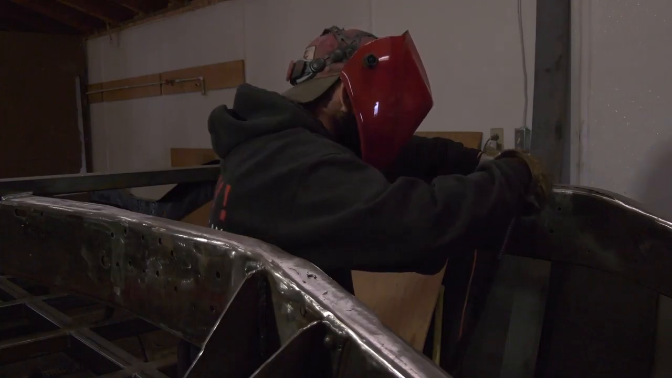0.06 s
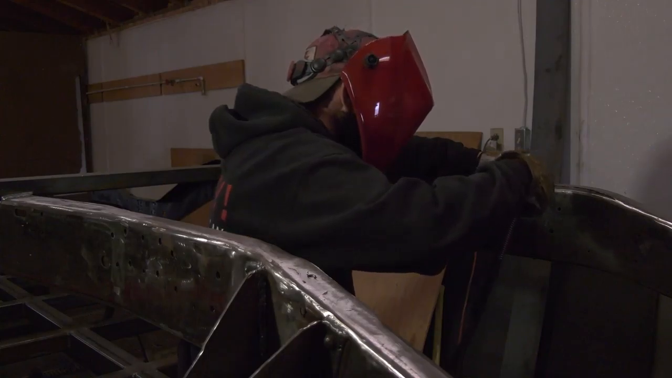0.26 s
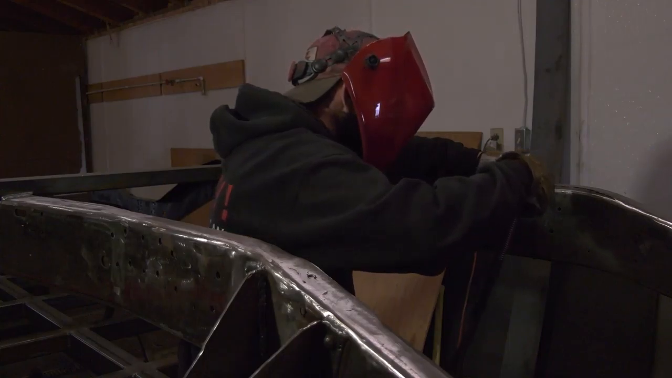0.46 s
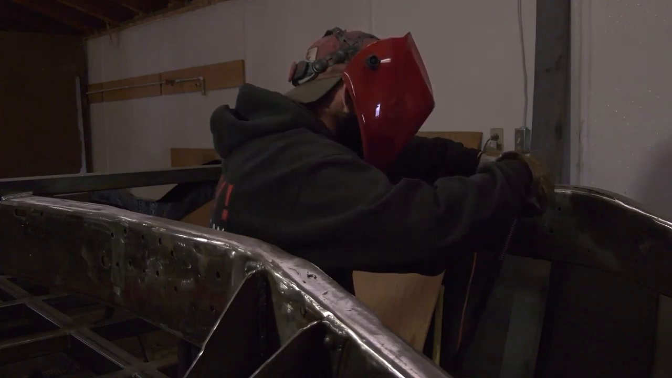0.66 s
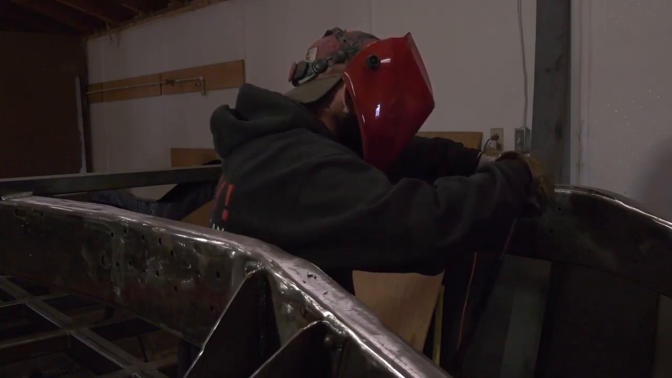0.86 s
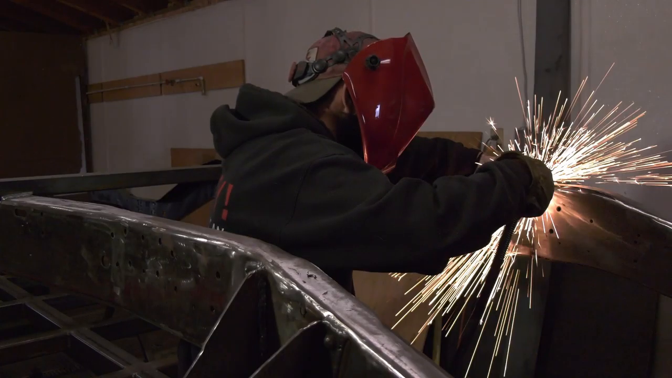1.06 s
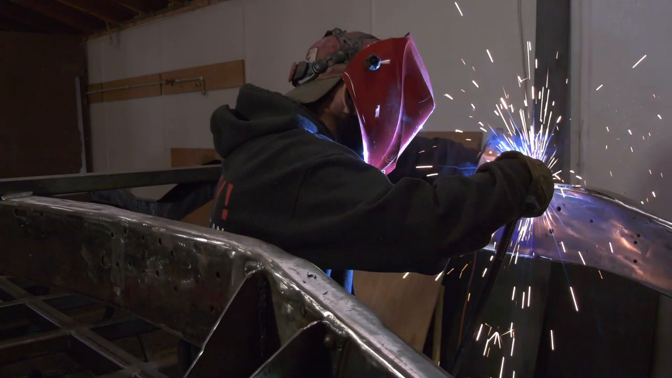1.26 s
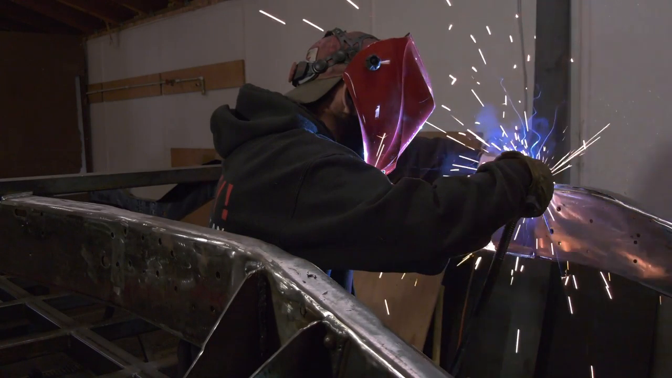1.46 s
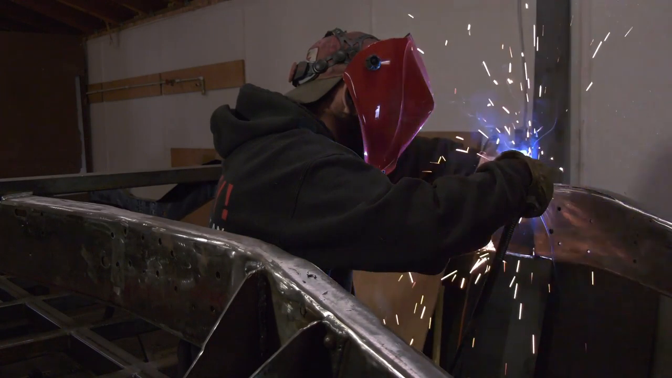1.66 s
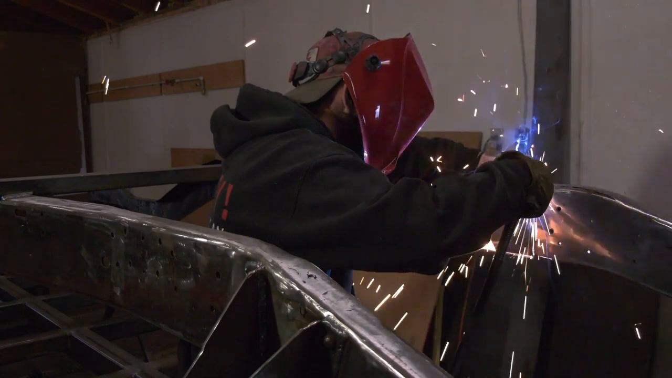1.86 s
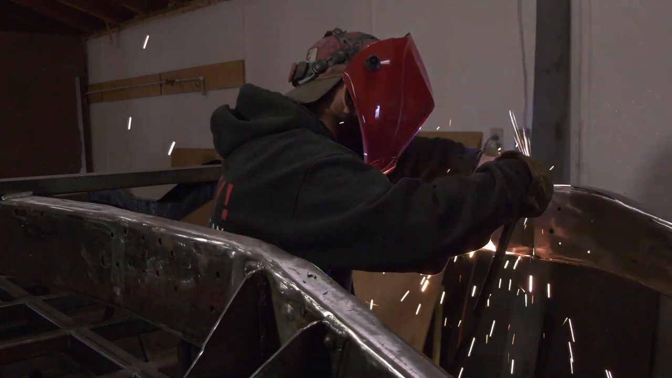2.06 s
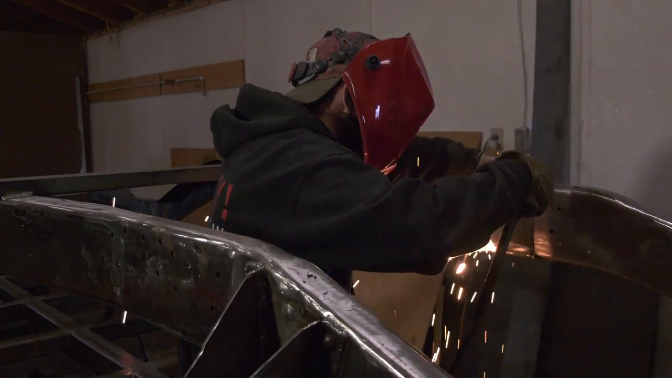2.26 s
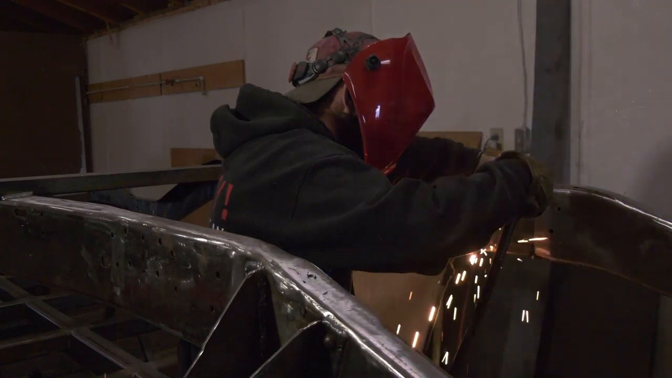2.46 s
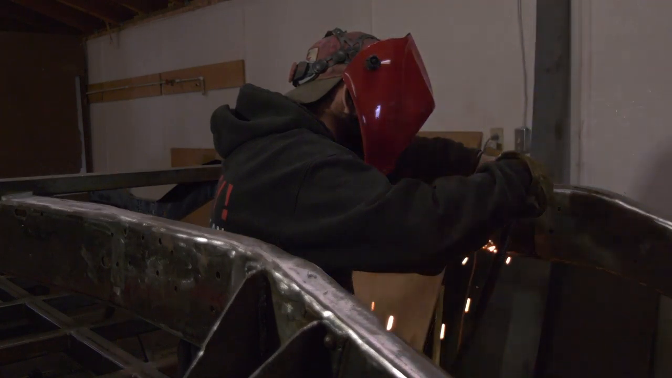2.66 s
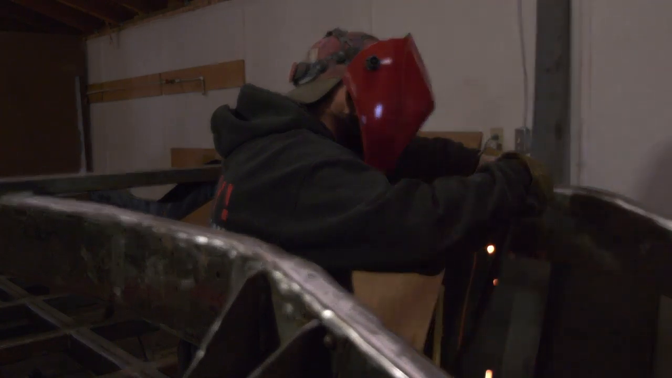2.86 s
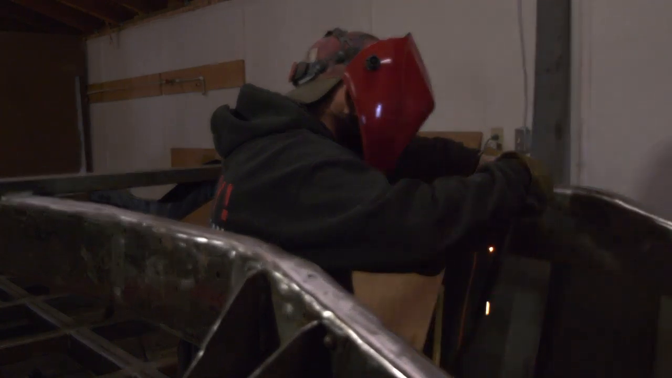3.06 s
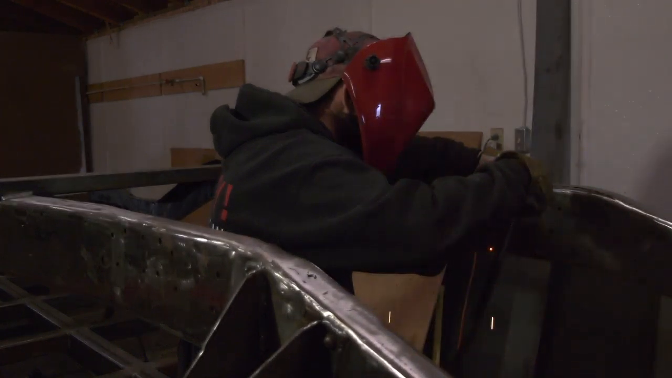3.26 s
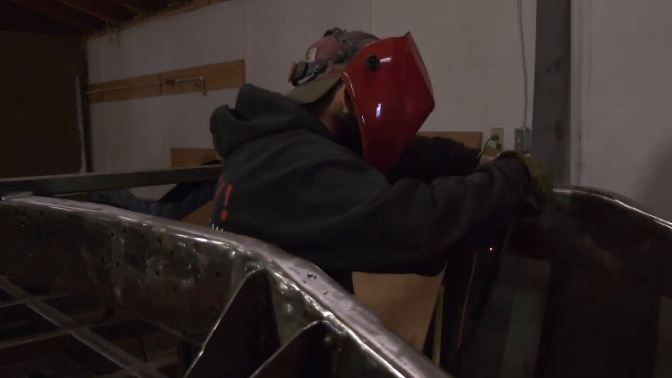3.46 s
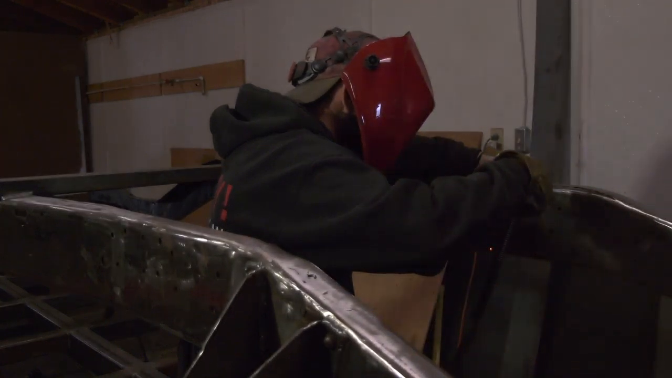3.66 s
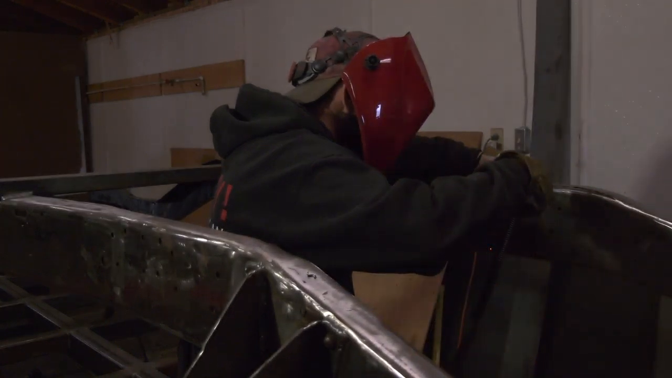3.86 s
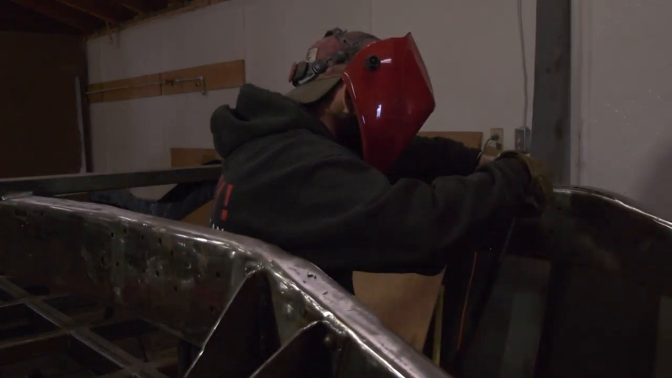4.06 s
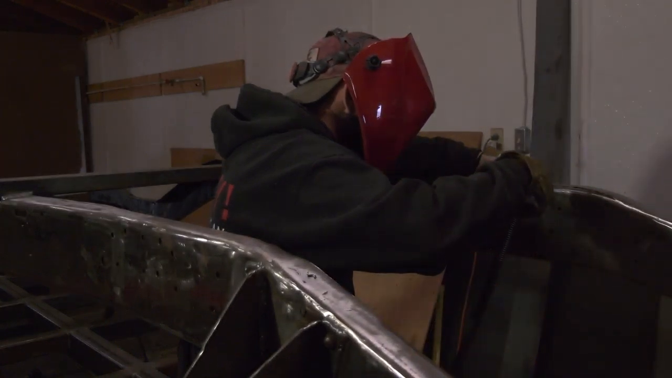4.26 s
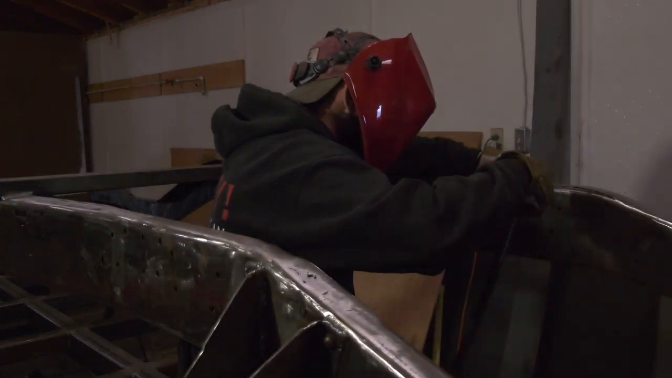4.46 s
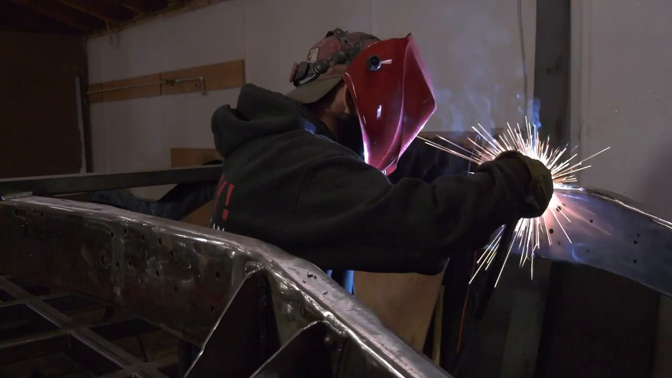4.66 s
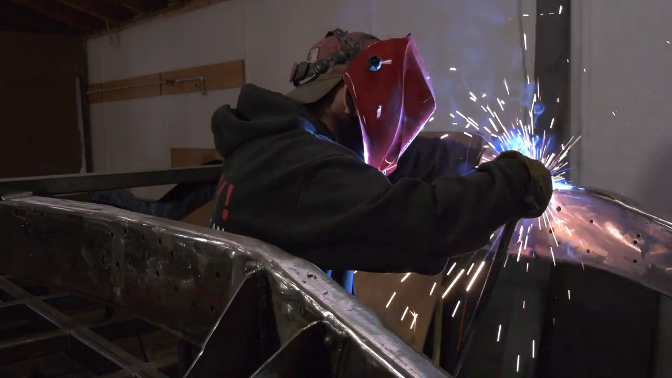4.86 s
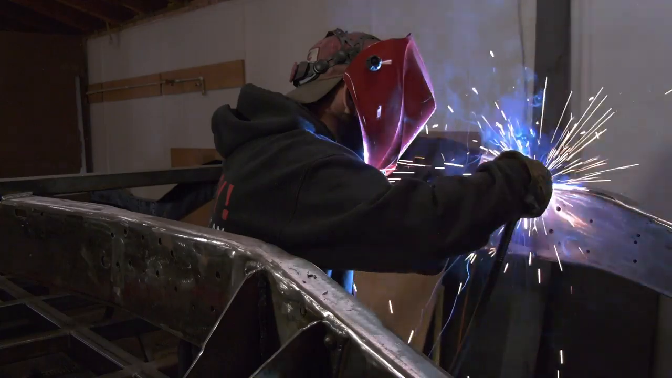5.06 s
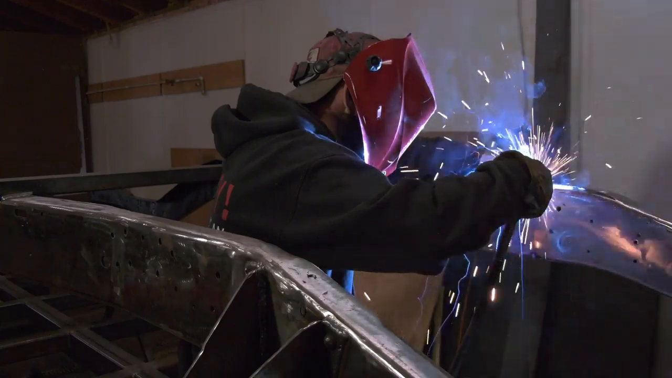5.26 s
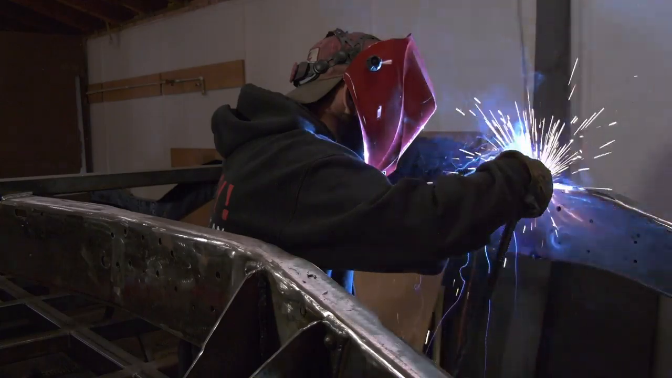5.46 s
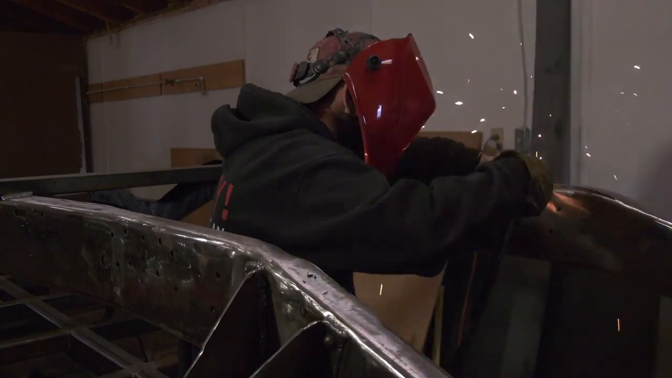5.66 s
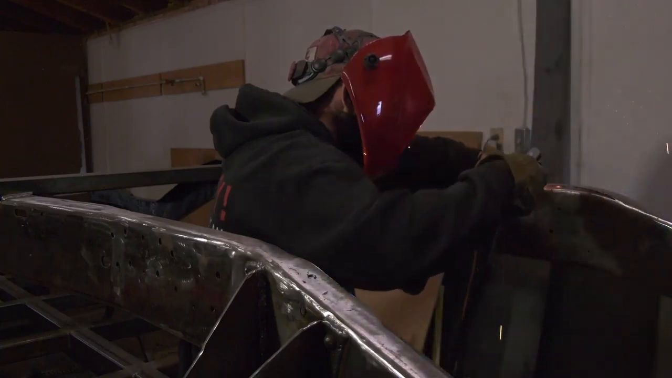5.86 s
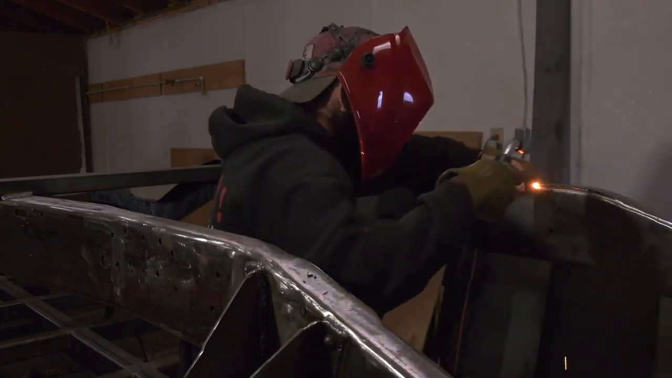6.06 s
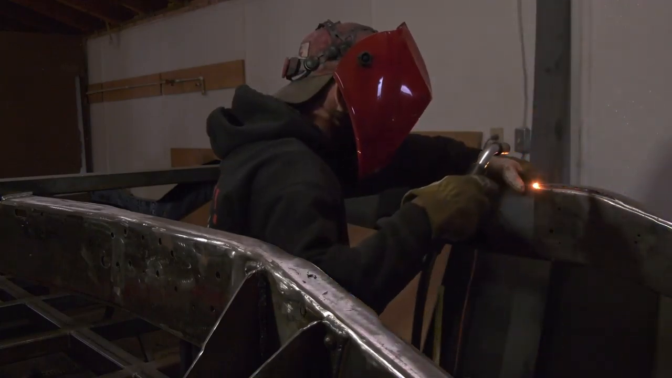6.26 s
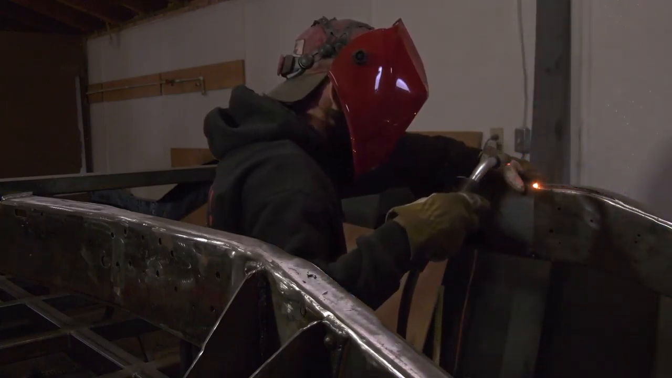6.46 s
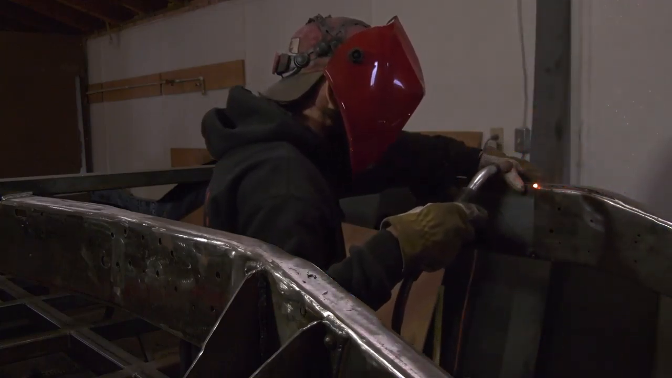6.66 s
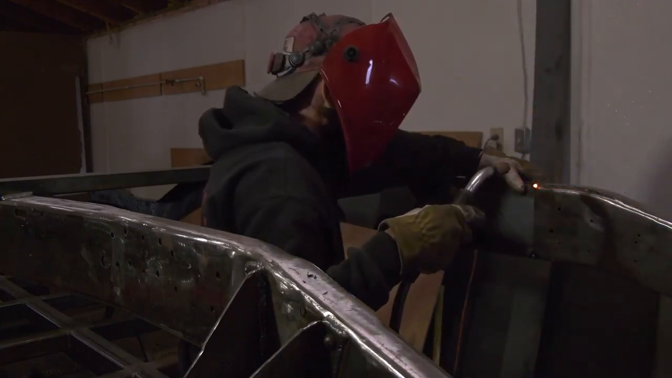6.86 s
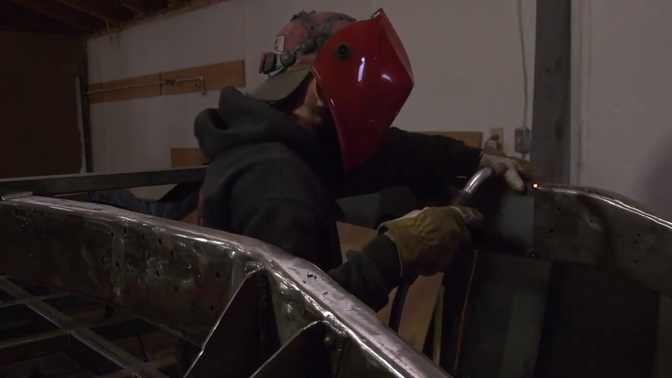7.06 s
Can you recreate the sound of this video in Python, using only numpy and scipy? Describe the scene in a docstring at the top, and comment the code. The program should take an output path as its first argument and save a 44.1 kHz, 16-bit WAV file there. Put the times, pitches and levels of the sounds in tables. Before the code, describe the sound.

A steady low mains hum and soft fan rush sit in a hard, echoing workshop. Around 0.6 s a glove or torch scuffs dully on steel. At 1.1 s an arc strikes with a sharp bang, sputters unevenly, then from 1.3 s crackles about a hundred times a second, a harsh bright buzz with loud spatter pops and low electrical thumps. It cuts off near 2.1 s, leaving a roughly one-second tail and faint gas hiss. A valve clacks at 2.8 s, with tiny ticks near 3 s; hiss ends at 3.5 s. Subtle scuffs and a faint metallic nozzle touch come by 4.35 s. At 4.7 s a second, stronger strike bursts into steadier fierce crackling, ending about 5.6 s. The tail fades over hum, recovering from ducked gain; a valve clacks at 6.35 s, then a dull scuff at 6.5 s.

```python
"""Tack welding in a workshop

Two MIG tack welds on a steel frame in a hard-walled shop, over transformer hum and the rush of a cooling fan.
The arc strikes with a bang and sputters (shaped noise, low electrical thumps), then crackles as the wire shorts
about a hundred times a second (spikes and fizz). A faint hiss lingers, a valve clacks, gloves and torch scuff.
A stereo microphone pair hears it with reflections and a long tail; the camera's gain ducks and creeps back."""
import sys
import numpy as np
from scipy import signal
from scipy.fft import rfft, irfft, next_fast_len
from scipy.io import wavfile
from scipy.ndimage import uniform_filter1d, map_coordinates

SR = 44100
rng = np.random.default_rng(int(sys.argv[2]) if len(sys.argv) > 2 else 0)


def store_pcm(level_fs):
    """Save levels as 16-bit WAV."""
    pcm = np.round(np.clip(level_fs, -1, 1) * 32767).astype(np.int16)
    wavfile.write(sys.argv[1], SR, np.atleast_2d(pcm).T)


N = 313462

# Transformer hum. Each row: multiple of the mains frequency, relative level in dB.
HUM_HARMONICS = [(2, -39.5), (5, -57.5), (6, -57.5), (7, -65.5), (8, -46), (10, -54), (12, -62.5),
                 (13, -63), (16, -69.5), (18, -65.5), (22, -66.5), (25, -72)]
MAINS_HZ = 59.9
# Rush of the cooling fan. Each row: frequency in Hz, relative density in dB per Hz.
FAN_SPECTRUM = [(25, -15), (50, -12), (110, -2.5), (250, -0.5), (650, -5.5), (1400, -15.5), (2800, -20),
                (6500, -26.5), (10500, -28.5), (15800, -23.5)]
# Likeness of the fan at the two microphones. Each row: frequency in Hz, left-right correlation (-1 to 1).
FAN_ALIKE = [(100, 1), (450, 0.38), (1200, 0.11), (3000, -.1), (6000, -0.15), (15000, .1)]

# Faint hiss at the nozzle; the first outlasts the valve's clack. Each row: start in seconds, end in seconds.
GAS_HISS = [(1.08, 3.5), (4.7, 6.35)]
# Gloves and torch shift on the frame.
# Each row: start in seconds, dull level in dB, bright level in dB, 60 dB decay in seconds.
SCUFFS = [(.58, -33.5, -60, 0.38), (.73, -46, -74, 1.5), (3.31, -74, -63, .4), (3.619, -68.5, -61, .6),
          (4.021, -72, -60, .6), (4.35, -58.5, -56.5, .4), (4.48, -68, -54.5, .9), (6.09, -57, -52, .9),
          (6.48, -38.5, -64.5, 1.28)]
# Small ticks of spatter and wire. Each row: time in seconds, level in dB.
TICKS = [(1.0786, 11.5), (2.9394, -19.5), (3.0185, -16), (4.3494, -35.5), (4.6593, -22)]
# Colour of the dull part of a scuff. Each row: frequency in Hz, relative density in dB per Hz.
DULL_SPECTRUM = [(80, -24.5), (300, 2.5), (550, 6.5), (750, 1.5), (1000, -8.5), (1700, -13), (3000, -34),
                 (10000, -58)]
# The torch nozzle touches the steel. Each row: frequency in Hz, level in dB, 60 dB decay in seconds.
NOZZLE_MODES = [(1960, -58, 0.25), (2360, -59, .3), (2900, -61, .28), (3380, -57, .3)]

# The gas valve shuts. Each row: time in seconds, level in dB.
VALVE_CLACKS = [(2.776, -16.5), (6.348, -15)]
# Colour of the valve's rattle. Each row: frequency in Hz, relative density in dB per Hz.
CLACK_SPECTRUM = [(60, -21), (190, 1), (272, 12), (370, -2), (1200, -5), (2600, -10), (5000, 0),
                  (7000, -4.5), (10000, -8.5), (15800, -18.5)]
# The welder's case rings with the valve.
# Each row: frequency in Hz, level in dB within the clack, 60 dB decay in seconds.
CASE_MODES = [(250, -17, 0.052), (283, -3.5, 0.15), (940, -22, 0.18), (1371, -19, 0.22), (3130, -28, 0.51),
              (4750, -17, 0.065)]

# Low electrical thumps picked up as the arc switches. Each row: time in seconds, level in dB.
THUMPS = [(1.0951, 14), (1.3445, 3), (1.3893, 12), (1.6481, 12.5), (1.7723, 10), (4.7836, 15.5),
          (4.849, 23), (5.0547, 16.5), (5.0657, 16.5), (5.2221, 13.5)]
SMALL_THUMP_DB = -3  # ceiling of the lesser ones that fall at random while the wire feeds
LEFT_LAG_S = .0004  # the left pulse comes this much later

# The tack welds. Each row: arc lit in seconds, wire feeding steadily in seconds, trigger let go in seconds,
# short circuits per second, sizzle level in dB, roar level in dB, crack level over the sizzle in dB.
WELDS = [(1.092, 1.303, 2.056, 100, -8.5, -23.5, 27), (4.7, 4.789, 5.564, 105, -2.5, -14, 25)]
# The arc strikes or flares.
# Each row: start in seconds, sizzle in dB, roar in dB, swell in seconds, 60 dB decay in seconds.
FLARES = [(1.0933, 3, 5, .001, 0.077), (1.13, -4.5, -5, .068, 0.22), (1.209, 3.5, -14, .002, 0.029),
          (1.258, 2, -14.5, .032, 0.13), (1.759, 2.5, -11.5, .004, 0.11), (1.92, -14.5, -20.5, .11, .1),
          (4.7038, 13.5, -6.5, .001, .05), (4.766, 7, -17, .013, .1), (4.9, -8.5, -26, .09, .2),
          (5.049, 8, -9.5, .005, .06), (5.223, 4.5, -12.5, .003, .08), (5.598, -4.5, -26, 0.018, .09)]
# The loudest cracks of spatter. Each row: time in seconds, relative level in dB.
LOUD_CRACKS = [(1.3194, 0), (1.3354, -1), (1.3474, 3), (1.5454, -2), (1.5678, -4), (1.6262, 0.5),
               (1.7265, -2), (1.7968, 3.5), (1.9046, -2), (1.949, 1), (2.0098, -1.5), (2.1011, -4.5),
               (4.995, -1), (5.1003, -3), (5.1911, -2.5), (5.5124, -3), (5.5468, -4), (5.5987, -3.5),
               (5.6124, -0.5)]
LOUD_CRACK_DB = 23  # gain shared by those cracks
ARC_RISE_S, ARC_FADE_S = .005, .012  # time constants of lighting and going out
SAG_DB_PER_S = 2.5  # the sizzle calms as the steel heats up
WANDER_DB, WANDER_PER_S = 0.47, 18  # the arc length is never quite steady
DIP_DB, DIP_S = 1.5, 0.035  # the arc burns weakly after each listed thump
# Colours of the sizzle, the cracks and the roar. Each row: frequency in Hz, relative density in dB per Hz.
SIZZLE_SPECTRUM = [(40, -31), (170, -6), (400, -10), (1300, -11), (1850, -12.5), (3500, -5.5), (4400, 0),
                   (6200, 0), (7500, -4.5), (9000, -0.5), (11000, -1), (13500, -6), (15800, -4),
                   (16500, -40)]
CRACK_SPECTRUM = [(40, -32), (200, -6.5), (1300, -8), (1900, -13), (3500, -5.5), (4400, -2), (6000, -1.5),
                  (7500, -2), (9300, 1), (11500, 0.5), (15800, -6), (16500, -41.5)]
ROAR_SPECTRUM = [(30, -28), (140, -2.5), (400, -1.5), (800, -1), (1200, 0), (2050, -4), (3000, -3.5),
                 (6000, -23.5), (15000, -46.5)]
# Resonances of the steel frame. Each row: centre in Hz, width in Hz, gain at the centre in dB.
FRAME_MODES = [(171, 14, 0.5), (293, 28, -1.5), (1206, 16, -6.5), (1406, 54, -5), (1497, 20, -6.5),
               (4210, 32, -4.5), (4351, 33, -5), (4840, 36, -5), (4905, 20, -4), (5906, 18, -6),
               (6509, 35, -5), (8822, 45, -8)]

# Decay of the workshop's tail. Each row: frequency in Hz, 60 dB decay in seconds.
HALL_DECAY = [(100, 1.3), (300, 1), (1000, 1.08), (2000, 1.17), (5000, 0.86), (9000, 0.4147), (14000, 0.31)]
# Colour of the tail. Each row: frequency in Hz, level in dB before each source's own tail setting.
HALL_LEVEL = [(30, -12.5), (170, -2.5), (1000, 2), (5000, -7.5), (14000, -1.5)]
# Likeness of the microphones in the diffuse field. Each row: frequency in Hz, left-right correlation.
ROOM_ALIKE = [(100, .93), (450, .84), (1200, .76), (5000, .58), (9000, .48), (15000, 0.52)]
# Phase between the microphones. Each row: frequency in Hz, lag of the right in radians (negative: it leads).
MIC_LAG = [(3000, -0.5), (7000, 0.1), (8600, -1.2), (10500, -2.5), (15000, -2)]
# Balance of the microphones. Each row: frequency in Hz, left over right in dB.
MIC_BALANCE = [(200, -1), (6000, -0.5), (9000, 4), (12000, -0.5)]
TOP_HZ = 15900  # the camera passes nothing above this


def amp(db):
    """Decibels to gain."""
    return 10 ** (np.asarray(db) / 20)


def unit(x):
    """Scale to rms 1."""
    return x / np.sqrt(np.mean(x ** 2) + 1e-20)


def along(points, hz):
    """Read (Hz, value) points on a log frequency axis."""
    f, v = np.transpose(points)
    return np.interp(np.log(hz + 1), np.log(f + 1), v)


def clock():
    """The time of every sample, in seconds."""
    return np.arange(N) / SR


def wobble(rate):
    """A smooth random curve with this many knots a second."""
    knots = rng.standard_normal(int(N * rate / SR) + 4)
    return map_coordinates(knots, [clock() * rate])


def filtered(x, response):
    """x times a complex response of frequency."""
    m = next_fast_len(N + SR // 2)
    return irfft(rfft(x, m) * response(np.fft.rfftfreq(m, 1 / SR)), m)[..., :N]


def convolved(x, kernel):
    """x through one kernel, or one per channel."""
    return signal.fftconvolve(np.atleast_2d(x), np.atleast_2d(kernel), axes=1)[:, :N]


def coloured(x, spectrum, size=4096):
    """x through a causal minimum-phase filter of unit energy with this spectrum."""
    # folding the cepstrum onto positive times makes the filter causal
    cepstrum = irfft(np.log(amp(along(spectrum, np.fft.rfftfreq(size, 1 / SR)))))
    cepstrum[1:size // 2] *= 2
    cepstrum[size // 2 + 1:] = 0
    kernel = irfft(np.exp(rfft(cepstrum)))
    return convolved(x, kernel / np.linalg.norm(kernel))[0]


def noise(spectrum):
    """Coloured noise of about rms 1."""
    return coloured(rng.standard_normal(N), spectrum)


def impulses(times, gains):
    """One spike at each time."""
    return np.bincount(np.round(np.asarray(times) * SR).astype(int), gains, N)[:N]


def decay(age, t60):
    """An exponential fall of 60 dB in t60 seconds."""
    return np.exp(-np.log(1000) * age / t60)


def burst(s, t60, rise):
    """An envelope that rises at s and dies away."""
    age = np.maximum(clock() - s, 0)
    return (1 - np.exp(-age / rise)) * decay(age, t60)


def surge(s, swell, t60):
    """An envelope that grows from s for swell seconds, then dies away."""
    age = clock() - s
    return np.clip(age / swell, 0, 1) * decay(np.maximum(age - swell, 0), t60)


def ringing(s, modes, chatter=0.55):
    """Damped modes set going at s, their phase roughened by the chattering contact."""
    total = 0
    for hz, db, t60 in modes:
        phase = 2 * np.pi * hz * (clock() - s) + chatter * wobble(hz / 12)
        total = total + amp(db) * burst(s, t60, rise=0.0023) * np.sin(phase)
    return total


def spread(pair, hz, alike):
    """Two unrelated spectra become left and right of a diffuse field with this likeness."""
    turn = np.arccos(np.clip(along(alike, hz), -1, 1)) / 2
    mid, side = pair[0] * np.cos(turn), pair[1] * np.sin(turn)
    return np.array([mid + side, mid - side])


def diffuse(t60s, levels):
    """A stereo tail of noise in which each frequency has its own level and decay."""
    hz, t, z = signal.stft(rng.standard_normal((2, SR + SR // 2)), SR, nperseg=256)
    t60 = along(t60s, hz)[:, None]
    level = amp(along(levels, hz))[:, None]
    unit_energy = np.sqrt(2 * np.log(1000) / (t60 * SR))
    shape = level * decay(t, t60) * unit_energy
    return signal.istft(spread(z, hz[:, None], ROOM_ALIKE) * shape, SR, nperseg=256)[1]


def workshop(x, scatter_db, tail_db):
    """Direct sound, three near reflections, a quick scatter off the frame and the long tail of the shop."""
    scatter = diffuse([(200, 0.077), (10000, .13)], [(1000, scatter_db)])
    response = scatter + amp(tail_db) * diffuse(HALL_DECAY, HALL_LEVEL)
    response[:, 0] += 1  # direct sound
    for delay_s, gain in [(.0017, 0.22), (.0053, .25), (.0076, .35)]:
        response[:, round(delay_s * SR)] += gain
    return convolved(x, response)


def transformer(hum_db=2.0):
    """The transformer hums in steady sines on multiples of the mains frequency."""
    lines = 0
    for multiple, db in HUM_HARMONICS:
        cycles = multiple * MAINS_HZ * clock() + rng.random()
        lines = lines + amp(db) * np.sin(2 * np.pi * cycles)
    return amp(hum_db) * np.sqrt(2) * lines  # a sine of peak root 2 has rms 1


def fan(fan_db=-45):
    """The cooling fan rushes steadily: turbulent noise, spread wide between the microphones."""
    spectra = rfft([noise(FAN_SPECTRUM), noise(FAN_SPECTRUM)])
    return amp(fan_db) * irfft(spread(spectra, np.fft.rfftfreq(N, 1 / SR), FAN_ALIKE), N)


def background():
    """Hum and fan together, a little stronger in the left microphone."""
    return (transformer() + fan()) * amp([[1.05], [-1.05]])


def gas(gas_db=-60):
    """Faint hiss of noise through each weld and for a while after, the first outlasting its valve's clack."""
    hissing = sum((clock() > start) & (clock() < end) for start, end in GAS_HISS)
    return amp(gas_db) * hissing * noise(SIZZLE_SPECTRUM)


def scuffs():
    """Gloves and torch rub on the frame: dull and bright friction noise in soft strokes."""
    dull, bright = 0, 0
    for s, dull_db, bright_db, t60 in SCUFFS:
        stroke = burst(s, t60, rise=0.0041)
        dull = dull + amp(dull_db) * stroke
        bright = bright + amp(bright_db) * stroke
    unevenness = amp(1.8 * wobble(40))
    return unevenness * (dull * noise(DULL_SPECTRUM) + bright * noise(SIZZLE_SPECTRUM))


def ticks():
    """Spatter and wire tick: single spikes with the colour of a crack."""
    s, db = np.transpose(TICKS)
    return coloured(impulses(s, amp(db)), CRACK_SPECTRUM)


def nozzle_touch():
    """The torch nozzle touches the steel and rings faintly in a few damped modes."""
    return ringing(4.347, NOZZLE_MODES, chatter=.85)


def valve(rattle_db=3):
    """The gas solenoid drops shut: a burst of rattling noise, and the welder's case rings."""
    rattle = unit(amp(rattle_db * wobble(400)) * noise(CLACK_SPECTRUM))
    total = 0
    for s, db in VALVE_CLACKS:
        clack = rattle * burst(s, t60=0.13, rise=0.00068)
        total = total + amp(db) * (clack + ringing(s, CASE_MODES))
    return total


def thumps(width_s=0.00028, swing_hz=120, swing=1.6, fade_s=0.0027, left_share=0.55):
    """Electrical pickup as the arc switches: a blunt pulse, later on the left, with a low swing on the right."""
    t = np.arange(SR // 20) / SR
    lead_s = .0006  # room for the pulse's rising side

    def pulse(at):
        return np.exp(-((t - at) / width_s) ** 2)

    age = np.maximum(t - lead_s, 0)
    swing_back = swing * np.sin(2 * np.pi * swing_hz * age) * np.exp(-age / fade_s)
    left = left_share * pulse(lead_s + LEFT_LAG_S)
    right = pulse(lead_s) - swing_back

    s, db = np.transpose(THUMPS)
    jolts = impulses(s, amp(db))
    for _, feeding, stop, *_ in WELDS:
        when, size = rng.random(size=(14, 2)).T
        # lesser jolts of either polarity
        jolts = jolts + impulses(feeding + when * (stop - feeding), amp(SMALL_THUMP_DB) * (2 * size - 1))
    return convolved(jolts, [left, right])


def arc_levels():
    """Sizzle and roar gains: each weld lights, burns, dips after a listed thump and goes out; sizzle calms."""
    t, sizzle, roar = clock(), 0, 0
    for start, _, stop, _, sizzle_db, roar_db, _ in WELDS:
        age = np.maximum(t - start, 0)
        burning = (1 - np.exp(-age / ARC_RISE_S)) * np.exp(-np.maximum(t - stop, 0) / ARC_FADE_S)
        sizzle = sizzle + burning * amp(sizzle_db - SAG_DB_PER_S * age)
        roar = roar + burning * amp(roar_db)
    starved = sum((t > s) * np.exp(-((t - s) / DIP_S) ** 2) for s, _ in THUMPS)
    unrest = amp(-WANDER_DB * wobble(WANDER_PER_S) - DIP_DB * np.minimum(starved, 1))
    return sizzle * unrest, roar * unrest


def plasma(sizzle, roar, grain_db=4.0, plasma_db=-1.07):
    """The arc's hot gas sizzles and roars: two noises that surge with each flare and pulse with the current."""
    for s, sizzle_db, roar_db, swell, t60 in FLARES:
        flare = surge(s, swell, t60)
        sizzle = sizzle + amp(sizzle_db) * flare
        roar = roar + amp(roar_db) * flare
    # the rectified current pulses at twice the mains; the boiling metal adds fine grain
    ripple = 1 + 0.16 * np.sin(2 * np.pi * 2 * MAINS_HZ * clock())
    grain = amp(plasma_db) * unit(amp(grain_db * wobble(1500)))
    return ripple * grain * (sizzle * noise(SIZZLE_SPECTRUM) + roar * noise(ROAR_SPECTRUM))


def cracks(sizzle, scatter_db=3, jitter=.22):
    """Each short circuit of the wire ends in a crack, at a jittered rate; the loudest have set times."""
    loud_s, loud_db = np.transpose(LOUD_CRACKS)
    spikes = impulses(loud_s, amp(LOUD_CRACK_DB + loud_db))
    for _, feeding, stop, rate, _, _, over_db in WELDS:
        timing, size = rng.standard_normal((150, 2)).T
        s = feeding + np.cumsum(np.exp(jitter * timing)) / rate
        # a drop takes time to form: no ordinary crack within 5 ms of a loud one
        clear = np.abs(s[:, None] - loud_s).min(axis=1) > .005
        ready = (s < stop) & clear
        gain = np.interp(s, clock(), sizzle) * amp(over_db + scatter_db * np.clip(size, -2, 1))
        spikes = spikes + impulses(s[ready], gain[ready])
    return spit(spikes)


def spit(spikes, fizz=.22, life_s=0.00062):
    """Each crack is a spike and about a millisecond of fizz as the arc relights."""
    fading = np.exp(-np.arange(SR // 100) / SR / life_s)
    tail = fizz * convolved(spikes, fading)[0] * rng.standard_normal(N)
    return coloured(spikes + tail, CRACK_SPECTRUM)


def frame(x):
    """The steel under the arc adds its narrow resonances."""
    def response(f):
        total = 1
        for centre, width, db in FRAME_MODES:
            loss = 1j * f * width
            total = total + amp(db) * loss / (centre * centre - f * f + loss)
        return total
    return filtered(x, response)


def weld():
    """The arc's plasma and cracks, ringing the frame and filling the shop."""
    sizzle, roar = arc_levels()
    burning = workshop(frame(plasma(sizzle, roar)), scatter_db=0, tail_db=0.5)
    return burning + workshop(frame(cracks(sizzle)), scatter_db=0.5, tail_db=-1)


def microphones(x):
    """The pair differs in level and phase with frequency, so the treble turns out of phase."""
    def ports(hz):
        half_db = along(MIC_BALANCE, hz) / 2
        return [amp(half_db), amp(-half_db) * np.exp(-1j * along(MIC_LAG, hz))]
    return filtered(x, ports)


def scene():
    """Everything sounds in the shop before the microphone pair; the electrical thumps bypass room and pair."""
    small = gas() + scuffs() + ticks() + nozzle_touch() + valve()
    room = background() + workshop(small, scatter_db=0, tail_db=5) + weld()
    return microphones(room) + thumps()


def gain_control(x, limit_db=-6.0, recovery_db_per_s=2.5, window=440):
    """The gain drops at once when the level passes the limit, then recovers by a few dB a second."""
    power = np.abs(uniform_filter1d(np.mean(x ** 2, axis=0), window))  # averaged over 10 ms
    excess = np.maximum(10 * np.log10(power + 1e-12) - limit_db, 0)
    creep = recovery_db_per_s * clock()
    # the running maximum holds the strongest demand so far, which the creep slowly pays back
    return x * amp(creep - np.maximum.accumulate(excess + creep))


def record(dry):
    """Gain control, rounded clipping at full scale and the camera's band limit."""
    x = gain_control(dry)
    x = x / (1 + np.abs(x) ** 6) ** (1 / 6)
    return filtered(x, lambda hz: hz < TOP_HZ)


dry = scene()
out = record(dry)
store_pcm(out)
```